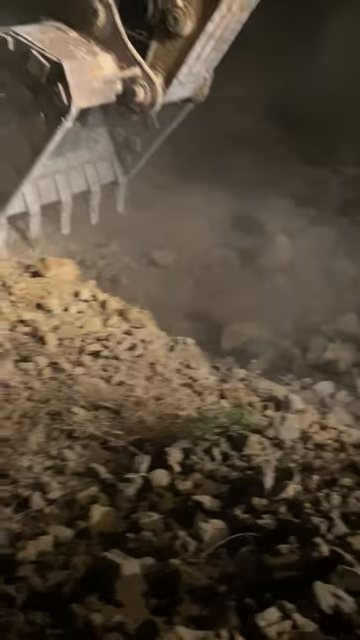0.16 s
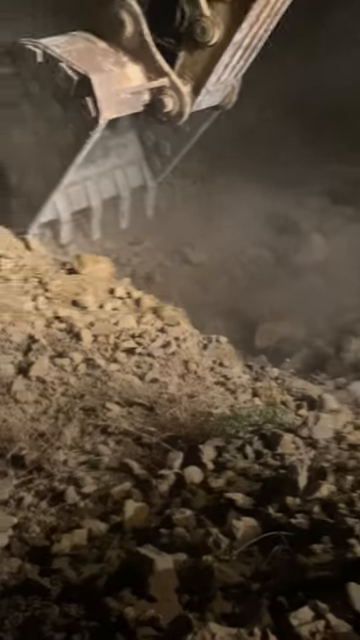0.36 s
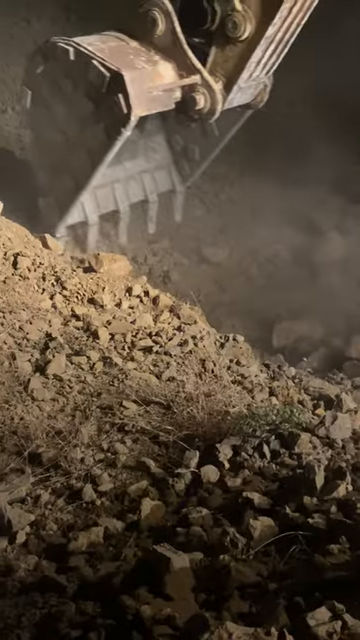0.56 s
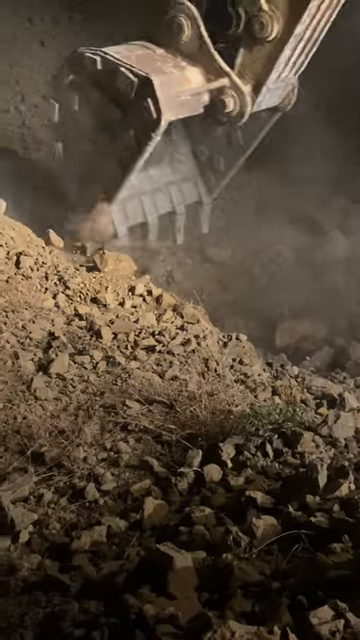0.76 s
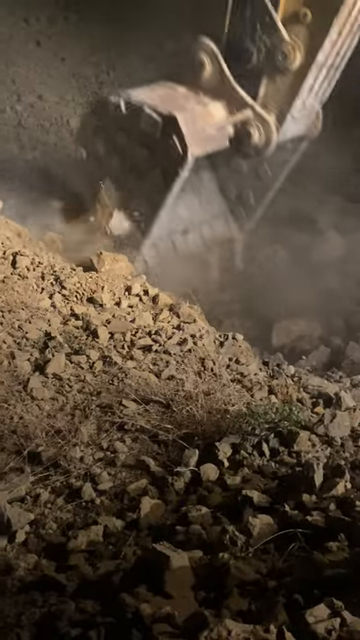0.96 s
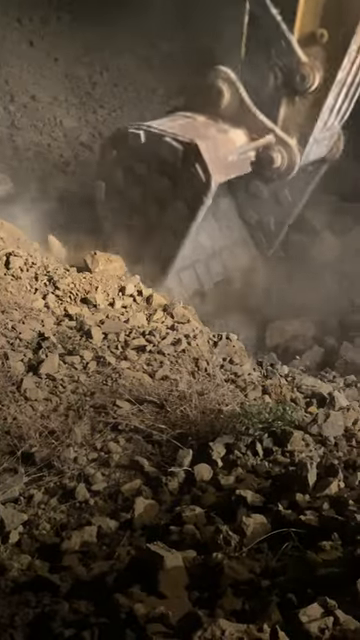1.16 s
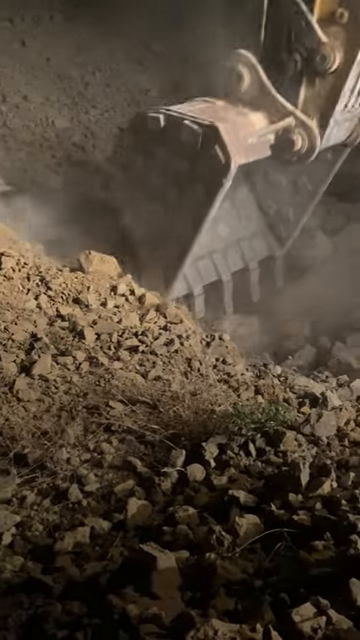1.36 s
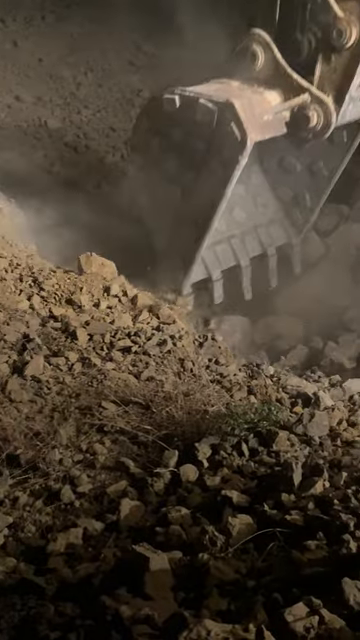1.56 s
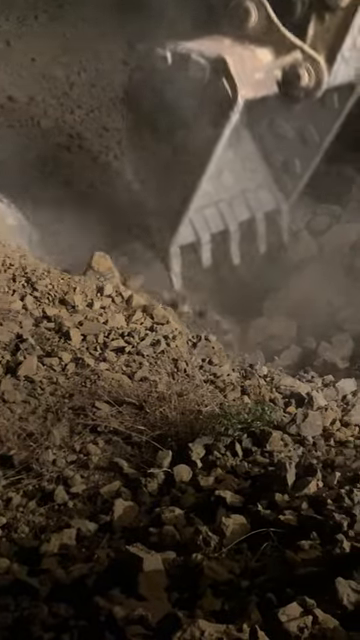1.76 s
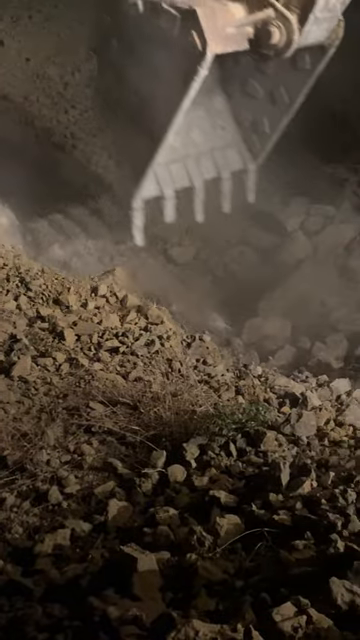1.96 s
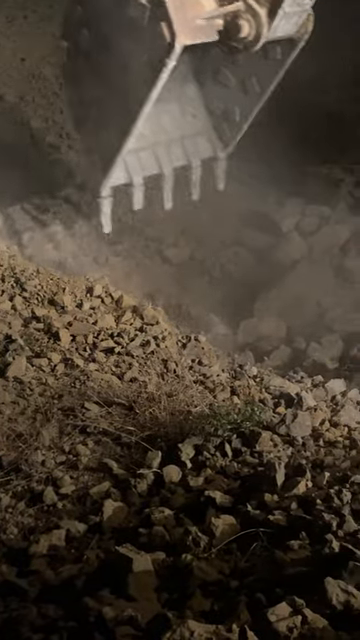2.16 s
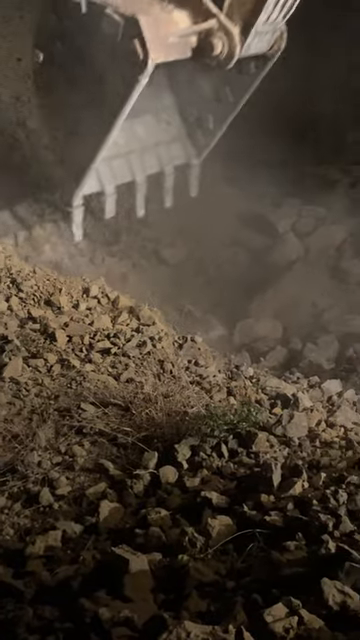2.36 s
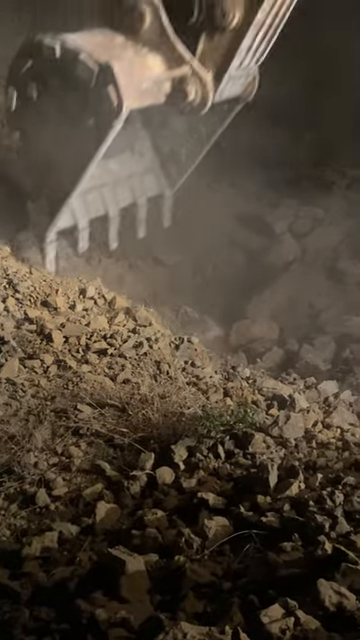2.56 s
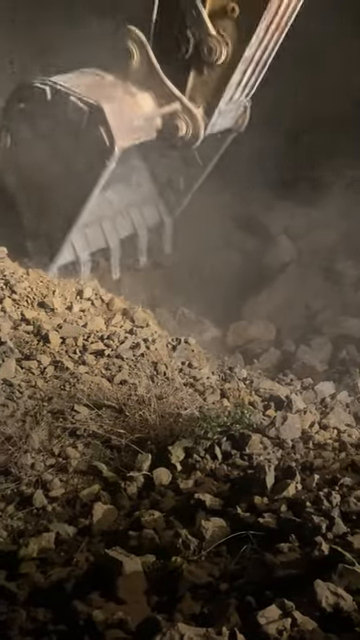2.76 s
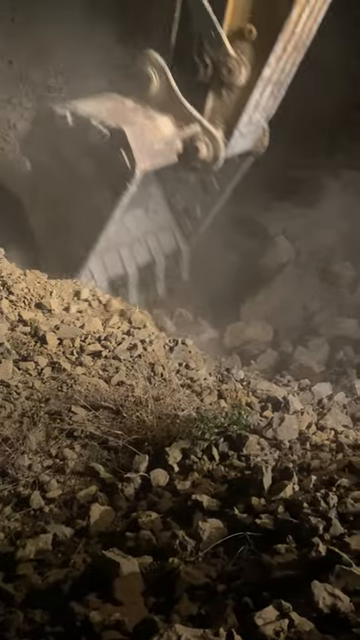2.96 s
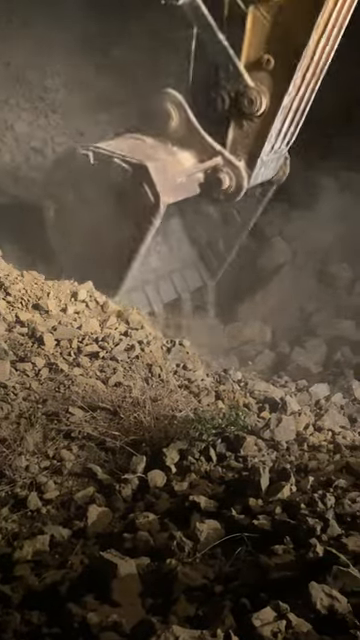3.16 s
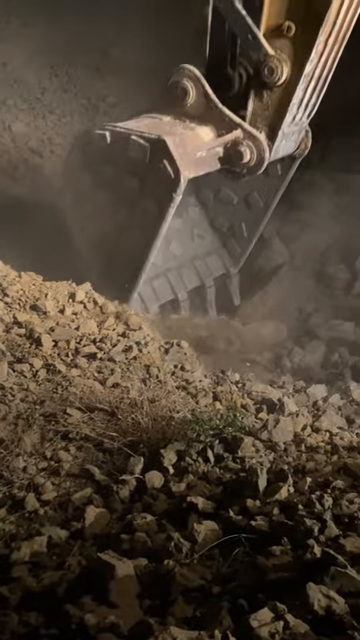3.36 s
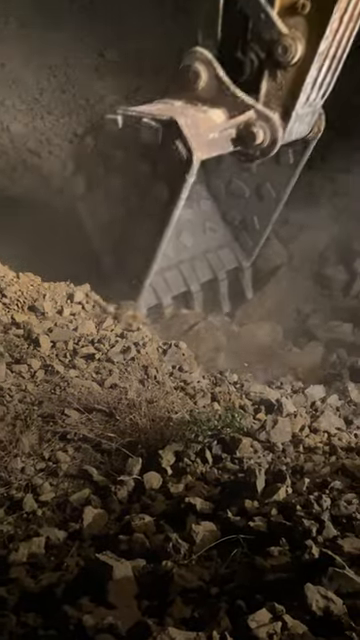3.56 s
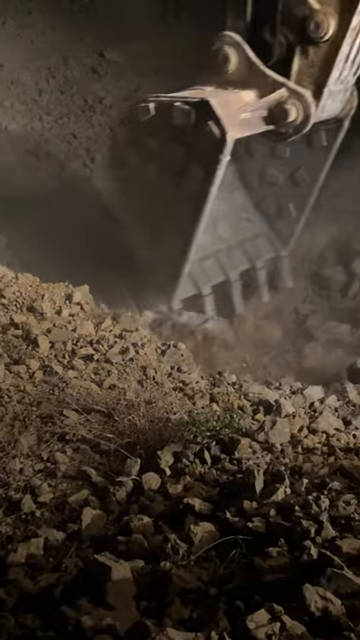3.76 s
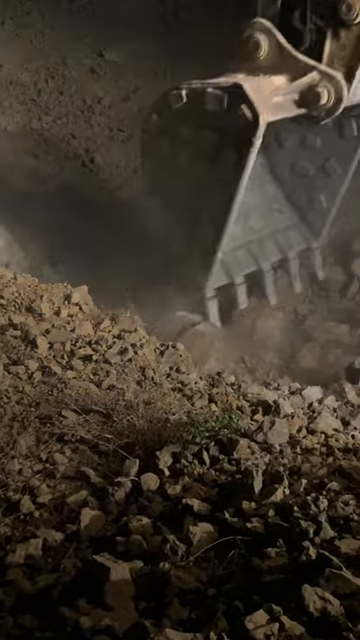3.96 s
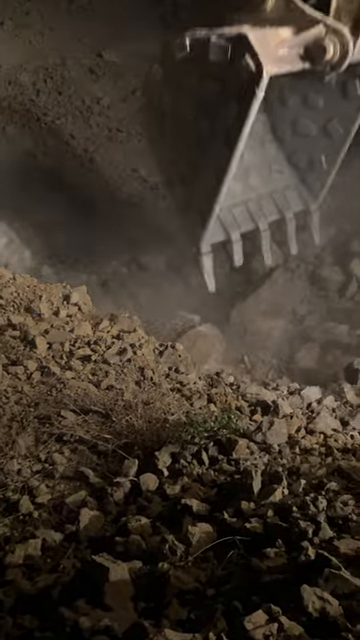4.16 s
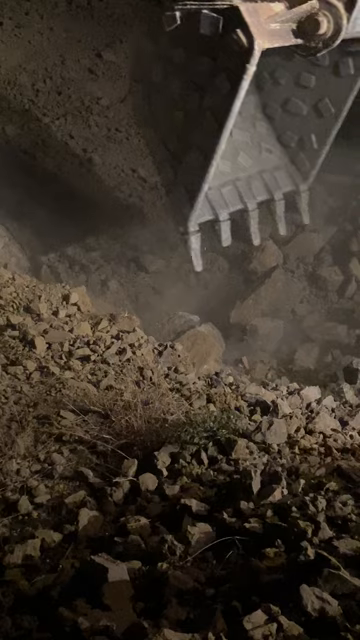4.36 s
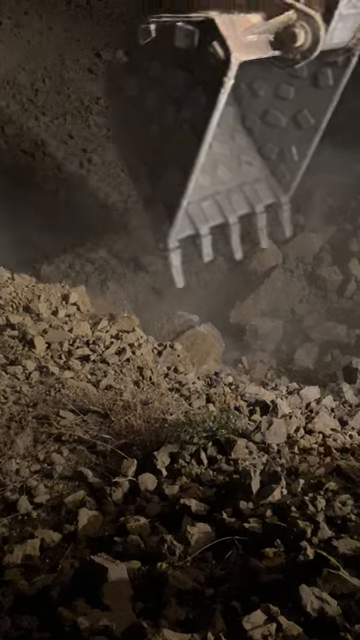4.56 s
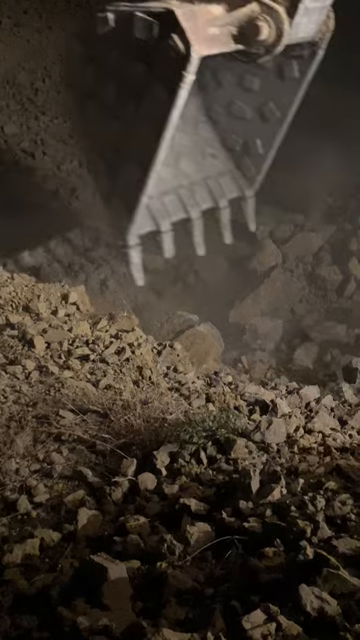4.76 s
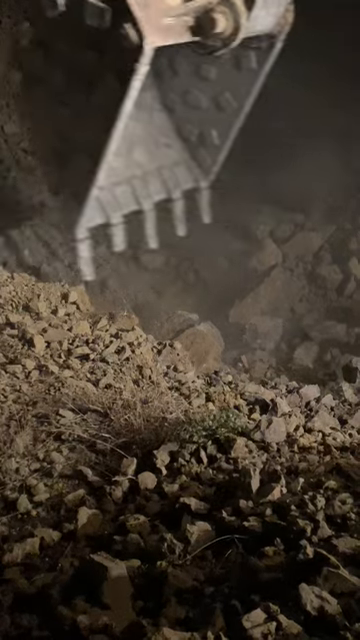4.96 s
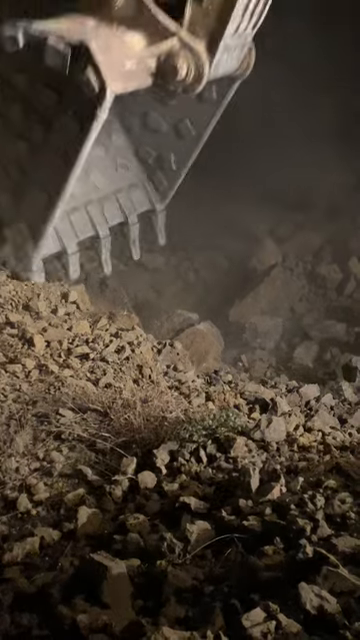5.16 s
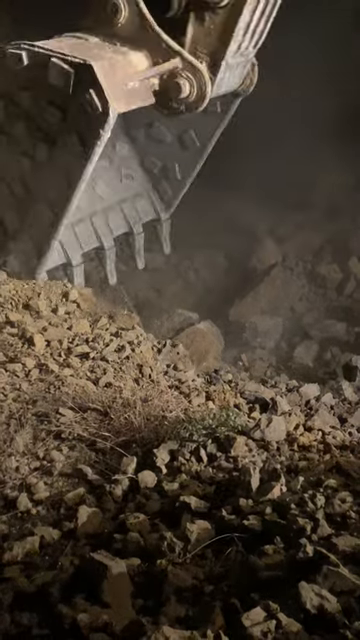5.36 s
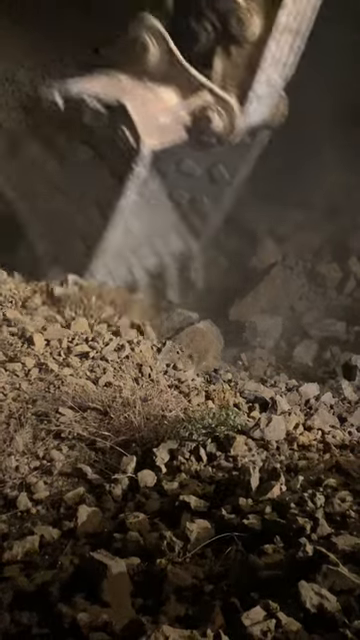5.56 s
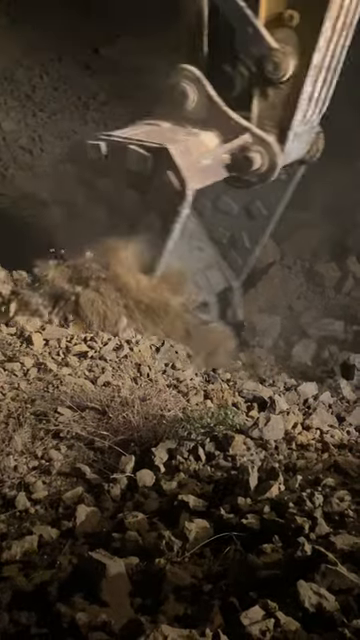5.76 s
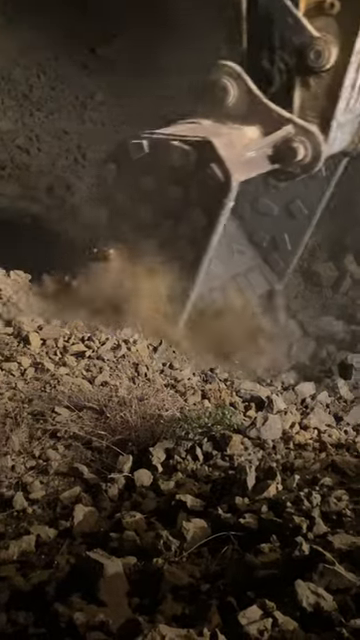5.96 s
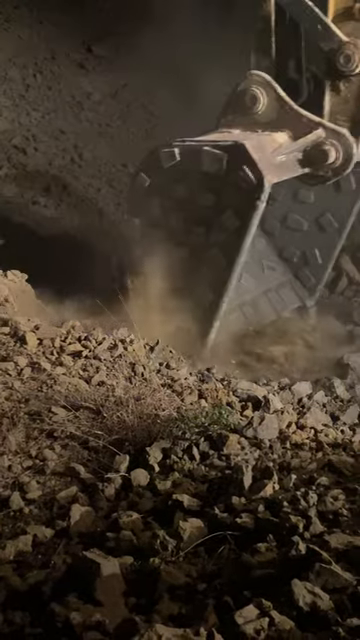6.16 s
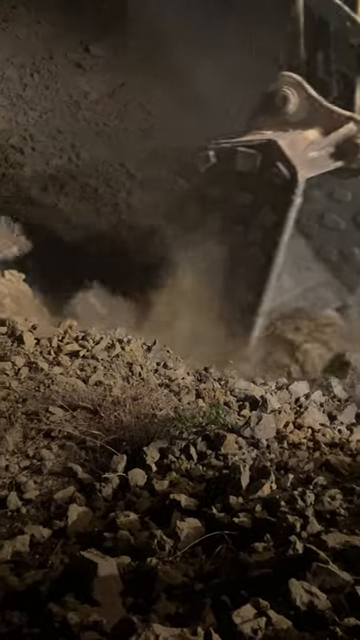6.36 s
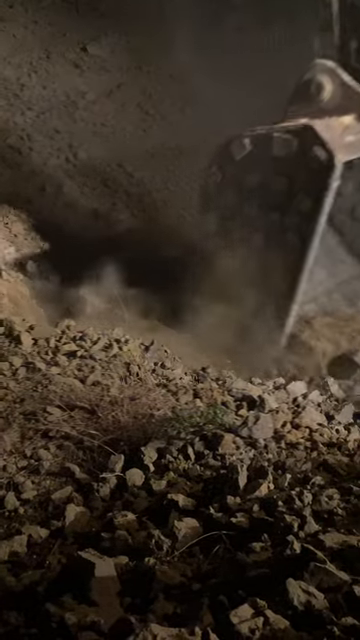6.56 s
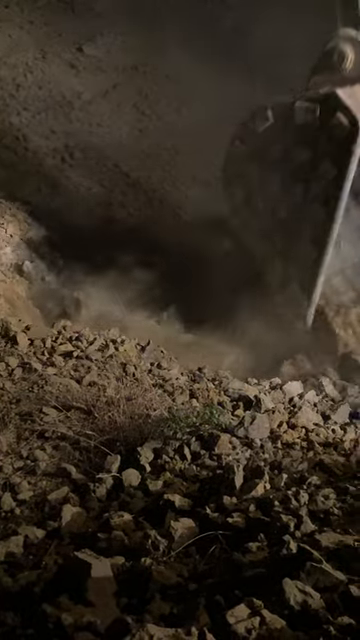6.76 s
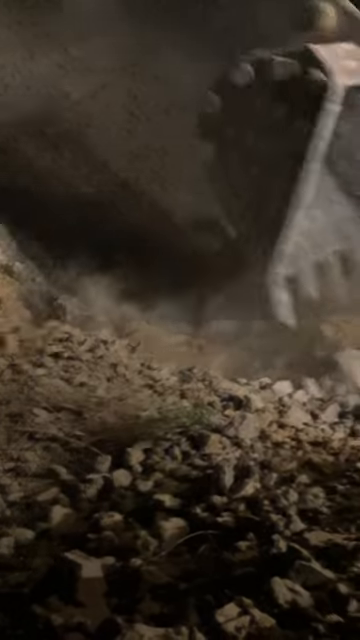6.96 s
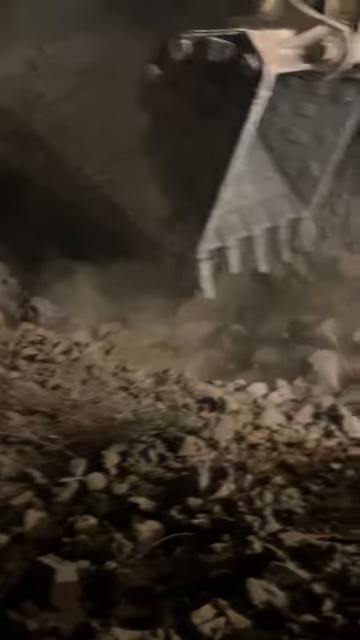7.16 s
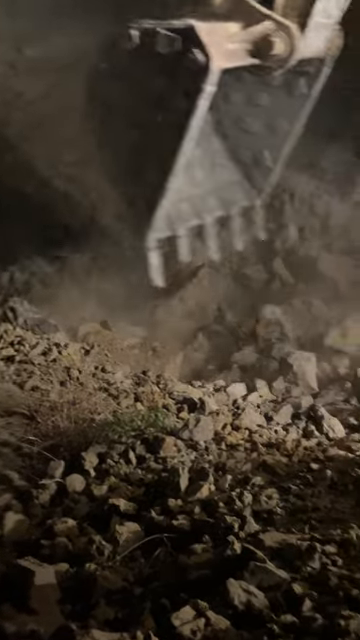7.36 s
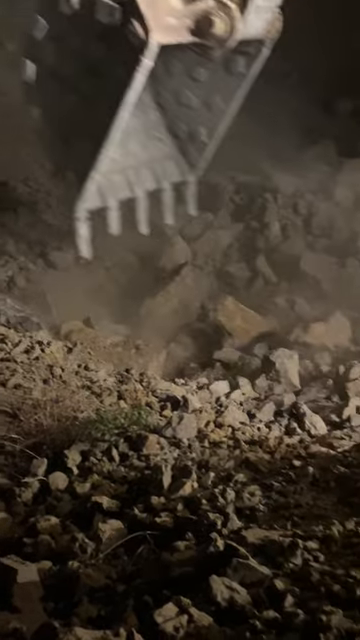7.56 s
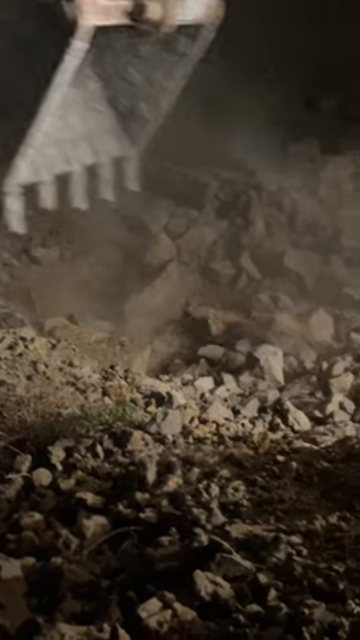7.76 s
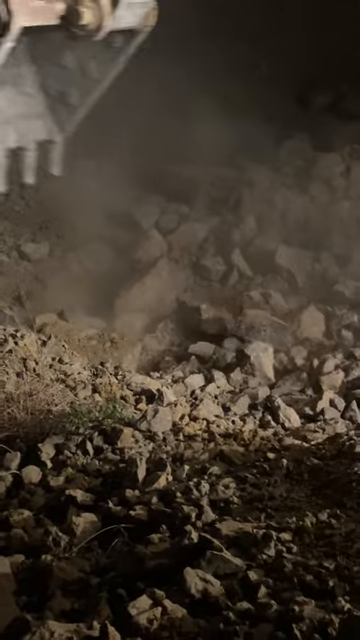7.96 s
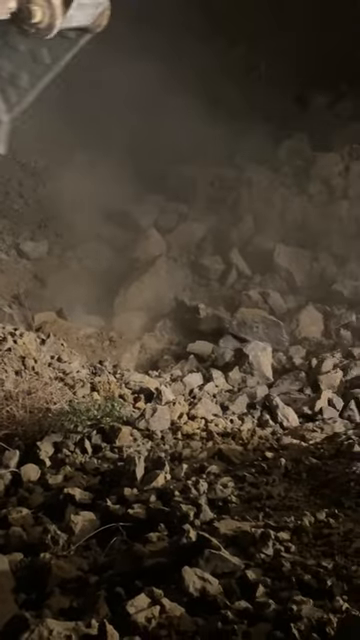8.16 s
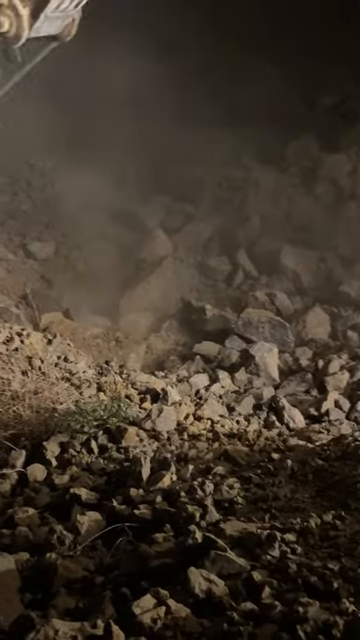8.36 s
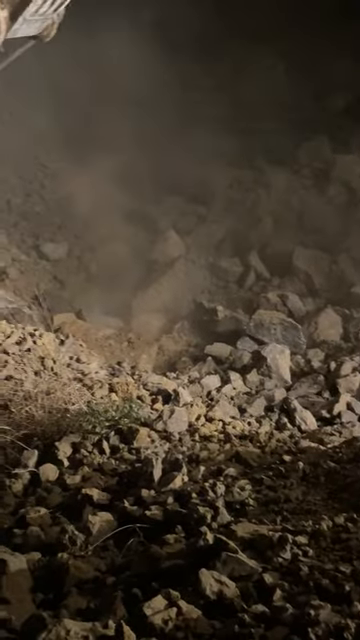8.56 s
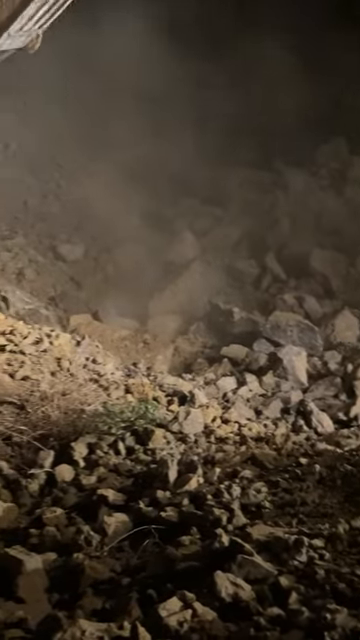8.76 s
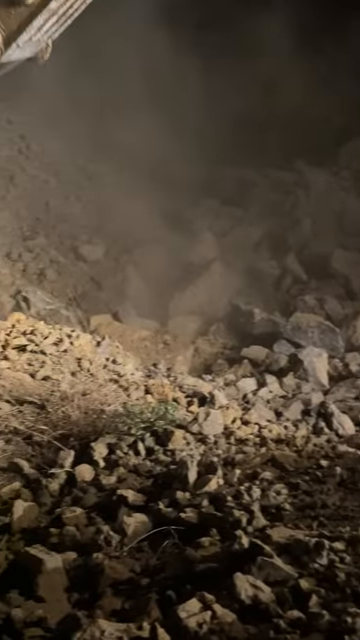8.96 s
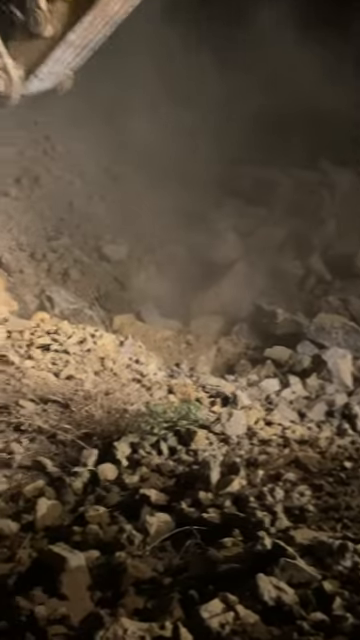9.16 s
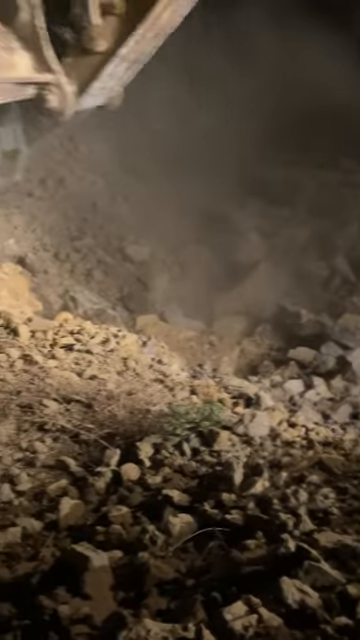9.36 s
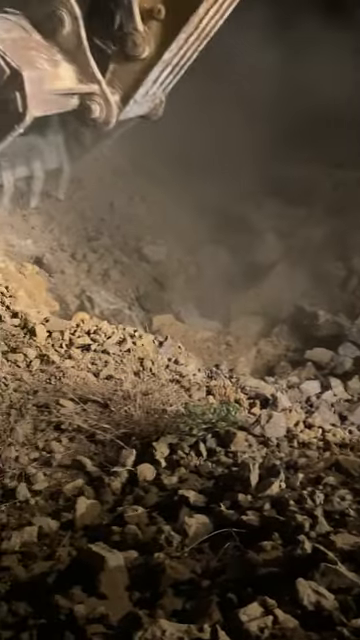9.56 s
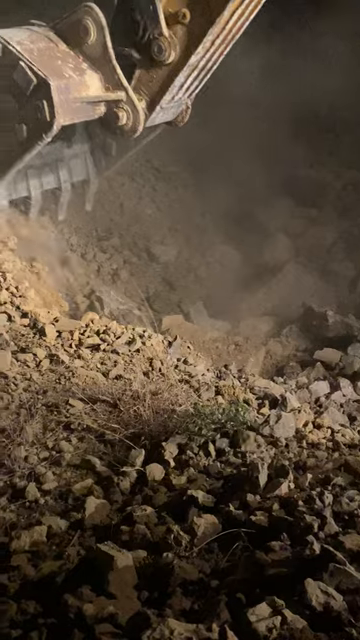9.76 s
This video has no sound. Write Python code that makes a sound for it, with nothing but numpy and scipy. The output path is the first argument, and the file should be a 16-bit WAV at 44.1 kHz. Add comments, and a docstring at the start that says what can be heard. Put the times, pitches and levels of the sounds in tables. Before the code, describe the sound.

Outdoors and close up, an excavator bucket drags through broken rock. Hard knocks, sharp cracks and gritty scraping come in bursts, with short metallic rings and rattling rubble. The scraping thins between strokes, grows dense around six seconds, then nearly stops, leaving the low diesel, a faint hydraulic whine and slight hiss. A final loud crunch begins just after nine seconds.

```python
"""Steel bucket in broken rock

An excavator drags its bucket through broken rock outdoors. Shaped noise makes the grinding and blows;
ringing filters make the steel and stones sing. Pulses and noise make the diesel, wavering sines its hum
and the hydraulic whine, and filtered noise a faint hiss. Two close microphone ports pick it all up."""
import sys
import numpy as np
from scipy import signal
from scipy.fft import rfft, irfft, next_fast_len
from scipy.io import wavfile

SR = 44100
rng = np.random.default_rng(int(sys.argv[2]) if len(sys.argv) > 2 else 0)


def generate_wav(sig):
    """Save sig (samples, or channels by samples) to the path in sys.argv[1] as 16-bit PCM at SR."""
    pcm = np.round(np.clip(np.atleast_2d(sig).T, -1, 1) * 32767).astype(np.int16)
    wavfile.write(sys.argv[1], SR, pcm)


N = 432621
TIME = np.arange(N) / SR   # seconds
SIZE = next_fast_len(N + SR // 4)   # filter length, with room for tails
HZ = np.maximum(np.arange(SIZE // 2 + 1) * SR / SIZE, 1)

# Edges of the five pitch ranges thud, body, rasp, grit and dust: a list of frequencies in Hz.
RANGES_HZ = [60, 400, 1400, 3500, 7000, 12500]
# Grinding of rock on steel, a curve over time. Each row: time in seconds, then the strength
# of body, thud, grit and dust in dB.
GRINDING = [(0.0, -33.5, -34.5, -59, -62), (0.3, -86, -43, -65, -66), (0.44, -29.5, -33, -57, -59),
            (0.74, -31, -30, -42, -54), (0.87, -26, -24, -42, -43), (0.98, -21, -33, -37, -58),
            (1.39, -41, -35, -57.5, -55.5), (1.94, -68, -36, -86, -66), (2.16, -30, -33.5, -47, -61),
            (2.46, -38, -35, -54, -73), (2.68, -37, -33, -55, -60), (2.79, -32.5, -37.5, -47.5, -73),
            (3.17, -24, -17, -36, -45), (3.4, -38, -29, -59.5, -57), (3.9, -34, -37, -52.5, -66),
            (4.07, -54, -43, -49, -71), (4.48, -34.5, -39.5, -91, -66), (4.7, -62, -41.5, -74, -71),
            (5.08, -50, -41, -55, -61), (5.27, -29.5, -45, -38.5, -55), (5.57, -30.5, -29.5, -48.5, -52),
            (5.85, -22, -29, -48, -44), (5.93, -45, -29, -58, -46), (6.02, -23.5, -37, -44, -48),
            (6.2, -34.5, -20, -39, -49), (6.34, -48, -34, -46, -47), (6.54, -33.5, -26, -41, -60),
            (6.67, -26, -23, -38, -54), (6.72, -25, -24, -34, -47), (6.79, -32, -20, -46, -51),
            (6.9, -26, -30.5, -48, -57), (7.16, -33.5, -31.5, -69, -67), (7.38, -46, -37.5, -60, -66),
            (8.14, -52.5, -36.5, -64, -61), (9.15, -37.5, -38.5, -58, -65), (9.23, -24.5, -34, -43, -48),
            (9.32, -18, -18, -38, -48), (9.37, -20, -18, -38, -39.5), (9.81, -23.5, -24.5, -40, -45.5)]
RASP_SHARE, RASP_DB = 0.59, -1   # grinding rasp lies this far from body to grit, then shifted in dB
# Stones and teeth striking. Each row: time in seconds, peak in dB, then thud, rasp and grit in dB
# relative to the body of the blow, the stone's note in Hz, the note in dB relative to the peak,
# basic time to fall 60 dB in seconds.
BLOWS = [(0.172, -22, -4, -16, -25, 556, -27, 0.7), (0.223, -22, -7, -4.5, -15.5, 690, -22, 0.95),
         (0.273, -3, 0.5, 0, -5.5, 860, -17, 0.27), (0.349, -10, -4, -5.5, -6, 1960, -28, 0.43),
         (0.407, -13, -5, -5, -6.5, 1900, -18, 0.23), (0.528, -13, 1, -7, -19, 1100, -25, 0.25),
         (0.677, -27, -25, 1, -13, 1150, -0.5, 0.41), (0.704, -10, 5.5, -5, -16, 1670, -14, 0.58),
         (0.74, -5, -22, -5, -7, 870, -14, 0.28), (0.791, -6.5, -20, -3, -8, 1090, -19, 0.23),
         (0.825, -12.5, -20, 1, -18, 1420, -25, 0.12), (0.898, -11.5, 3.5, -0.5, -8, 1760, -34, 0.44),
         (0.983, -15, -26, -0.5, -9, 1350, -21, 0.48), (1.078, -20.5, 17.5, 0, -25, 1330, -4, 0.36),
         (1.118, -1.5, -42, -3.5, -5.5, 2050, -25, 0.24), (1.335, -17.5, 5, -3.5, -17.5, 610, -12.5, 0.39),
         (1.535, -38.5, -3, 9, 5, 1360, -10, 0.11), (1.594, -30.5, -4, 4.5, -8, 547, -3.5, 0.74),
         (1.622, -13, -1, -1, -15, 577, -22, 0.54), (1.918, -28, -6, 2.5, -10, 500, -12, 0.57),
         (1.935, -13.5, -6, -4.5, -23, 530, -25, 0.81), (2.051, -30, -22, -9, -5, 1820, -3, 0.19),
         (2.086, -22, -7, 5.5, -2, 1930, -24, 0.45), (2.174, -13, -14, -10, -31, 810, -31, 0.79),
         (2.243, -18, 5, -27, -45, 930, -22, 0.11), (2.293, -13.5, 5.5, -9, -9.5, 830, -32, 0.21),
         (2.398, -16.5, -13, -1, -9, 594, -17, 0.28), (2.429, -11.5, 0.5, 0, -19, 1380, -15, 0.18),
         (2.575, -23, -26, 2, -15, 714, -16, 0.21), (2.603, -25, -30, 8.5, -4, 1290, -17, 0.46),
         (2.651, -9.5, -1, -0.5, -12, 1050, -30, 0.71), (2.692, -3.5, -3, -10, -14, 1180, -12.5, 0.2),
         (2.728, -7.5, 1.5, -0.5, -6.5, 920, -12.5, 0.23), (2.857, -17.5, -12, -6, 3, 610, -11.5, 0.17),
         (2.93, -29.5, -32, 7, -18, 636, -8, 0.55), (3.007, -19.5, -17, 6.5, -6, 1140, -5.5, 0.2),
         (3.079, -10.5, 4.5, -23, -31, 1380, -20, 0.13), (3.103, -5, -20, -0.5, -16, 1700, -16.5, 0.34),
         (3.17, -24, 4, -12, -21, 476, -10, 0.85), (3.245, -12.5, -11, -1.5, -16, 1320, -17, 0.46),
         (3.287, -15, -16, -23, -24, 870, -21, 0.81), (3.518, -19, 5, -64, -17, 490, -13, 0.94),
         (3.566, -12.5, 9.5, -7, -22, 1540, -9, 0.18), (3.597, -13.5, -8, -8, -25, 600, -24, 0.14),
         (3.672, -21, -28, 0, -9, 710, -16, 0.3), (3.711, -22, -44, 3, -2.5, 675, -12, 0.23),
         (3.908, -14, -2.5, -9, -22, 560, -26, 0.76), (3.961, -17.5, 10, 8, -8.5, 1410, -14, 0.16),
         (3.979, -25, -8, -7, -8, 1820, 3, 0.15), (4.221, -35.5, 14, 10.5, -12, 482, -7, 0.39),
         (4.292, -27.5, -6, -2.5, -13, 480, -13, 0.54), (4.402, -28.5, -8, 6.5, -8, 1260, -7, 0.4),
         (4.481, -16.5, -2.5, -7, -16.5, 560, -22, 0.5), (4.557, -19, -7, -1, -17, 1670, -16, 0.19),
         (5.073, -21.5, -11, -8, -16, 490, -14.5, 1), (5.091, -18.5, 9.5, 2.5, -5, 653, -14, 0.85),
         (5.19, -6.5, -21, -8, -14, 870, -14, 0.25), (5.2, -4, -4, 2, -14, 1780, -17, 0.15),
         (5.218, -8, -12, -3, -5, 1170, -7.5, 0.15), (5.249, -21.5, -14, -13, 5, 740, -5, 0.17),
         (5.34, -41, -20, -2, -14, 487, -12.5, 0.28), (5.42, -10, -1, -5, -11, 636, -35, 0.28),
         (5.571, -27, -6, 5, -26, 1190, -0.5, 0.26), (5.615, -15, 8, 0, -1.5, 2000, -19.5, 0.93),
         (5.663, 0, -15, -9, -9, 602, -17, 0.25), (5.892, -11, 3, -7, -21, 507, -14.5, 0.75),
         (5.992, -8.5, -13, -7.5, -30, 1100, -11.5, 0.058), (6.04, -11.5, -13, -3, -24, 486, -14, 0.12),
         (6.107, -11, 3.5, -7, -16, 940, -19, 0.51), (6.137, -11, -14, -16, -4, 526, -20, 0.32),
         (6.194, -31, 14, -13, -15, 1170, -11, 0.15), (6.236, -6.5, -8, -13, -37, 1560, -20, 0.13),
         (6.258, -12.5, -6, -14, -30, 436, -7, 0.13), (6.324, -15.5, -18, -4, -12, 470, -15, 0.35),
         (6.362, -14.5, -10, -11, -11, 467, -10, 0.71), (6.398, -6, 1.5, -4, -16, 1230, -17, 0.16),
         (6.428, -6, -3, -20, -15, 417, -28, 0.16), (6.483, -23, -5, 2, 0, 640, -20, 0.21),
         (6.55, -14.5, 2, -1, -5.5, 2980, -29, 0.42), (6.596, -3.5, 1.5, -2, -15, 1800, -24, 0.16),
         (6.729, -9.5, 0.5, -1.5, -9.5, 430, -8, 0.41), (6.745, -7, 0, -7, -13, 1910, -13, 0.11),
         (6.769, -16.5, 0, -11, -20, 460, -11, 0.13), (6.799, -13.5, -12, 1.5, -7, 513, -13, 0.49),
         (6.879, -24, -11, -7, 2.5, 2900, -10, 0.18), (6.934, -12.5, -2.5, -0.5, -12.5, 510, -17, 0.44),
         (7.072, -30, -13, -9, -2, 562, -4, 0.23), (7.095, -15.5, 2, -9, -20, 750, -19, 1),
         (7.134, -25, -12, -8, 10, 2920, -17, 0.34), (7.148, -12.5, -19, -19, -6.5, 1970, -16, 0.52),
         (7.253, -5.5, 0, -13, -11.5, 1770, -24.5, 0.3), (7.3, -13.5, 2.5, -1.5, -39, 515, -16, 0.27),
         (7.439, -37, 1, -7, -26, 520, -19, 0.23), (7.52, -27.5, -13, -3, -33, 537, -23, 0.23),
         (7.603, -35, -10, 0, -11, 800, -20, 0.22), (7.646, -25, -10, -3, -20, 565, -27, 0.52),
         (7.911, -26.5, -11, -1.5, -18, 830, -14, 0.46), (7.975, -27.5, -9, -2.5, -10, 860, -17, 0.68),
         (8.409, -24.5, 8, -7, -21, 800, -13, 0.55), (8.466, -8, 0.5, -12.5, -37, 650, -21, 0.19),
         (8.49, -14.5, -8, -15.5, -30, 825, -13, 0.28), (8.665, -31.5, -9, -6, -17, 534, -8, 0.27),
         (8.73, -34, -6, 1, -20, 1410, -12, 0.11), (8.78, -27.5, 6, -5, -26, 740, -18, 0.22),
         (8.819, -24, -9, -7, -19, 724, -18, 0.11), (8.912, -13.5, -5, -13.5, -33, 1260, -32, 0.35),
         (8.99, -26, 3.5, -16, -24, 670, -11, 0.16), (9.06, -39, -9, -4, -17, 1900, -8, 0.28),
         (9.146, -13, -25, -17, -23, 630, -22, 0.79), (9.18, -11, 4, -1, -8, 2900, -11.5, 0.28),
         (9.196, -8.5, 5, 2.5, -6.5, 915, -9.5, 0.28), (9.282, -12.5, -17, 1, -18, 1150, -8.5, 0.2),
         (9.329, -11, -23, 0.5, -27, 770, -20, 0.79), (9.39, -12, -7, -4, -3.5, 900, -14, 0.31),
         (9.427, 2, -1, -12, -19, 950, -18, 0.1), (9.463, -24.5, 22, 17, -21, 880, -19, 0.41),
         (9.489, -15.5, -6, 3, -2, 880, -4.5, 0.27), (9.555, -6, -14, -10, -17, 1000, -17.5, 0.17),
         (9.622, -4, -23, -14, -36, 945, -18.5, 0.26), (9.701, -26, -5, 15.5, -20, 1840, -6, 0.64),
         (9.791, -9.5, -13, -25, -37, 1015, -8, 0.28)]
# How far each range stretches a blow's rise and fall: one factor each for thud, body, rasp, grit, dust.
BLOW_SLOWNESS = [1.42, 1.14, 0.94, 0.89, 1.2]
RISE_S, HOLD_S = 0.006, 0.015   # a blow's basic rise, centred on its time; its fall starts at HOLD_S
CREST_DB = 11   # a blow's peak over its rms
BLOW_DUST_DB, BLOW_DUST_FOLLOWS = -30.5, 0.2   # dust relative to the body; dB of dust per dB of grit
# Stones splitting with a sharp bright crack. Each row: time in seconds, grit peak in dB,
# dust rms in dB, time to fall 60 dB in seconds.
CRACKS = [(0.268, -15, -43, 0.1), (0.536, -32, -55, 0.16), (0.6724, -29, -54, 0.11),
          (0.7128, -31, -48, 0.14), (0.7397, -13, -46, 0.12), (0.7926, -27, -38, 0.12),
          (0.9004, -30, -51, 0.12), (1.0028, -20, -37, 0.1), (1.119, -7, -28, 0.11),
          (1.5359, -36, -41, 0.12), (1.6053, -33, -63, 0.12), (1.631, -23, -43, 0.32),
          (1.934, -30, -44, 0.12), (1.9599, -36, -63, 0.12), (2.0567, -33, -59, 0.14),
          (2.0877, -39, -64, 0.12), (2.1585, -28, -59, 0.092), (2.1772, -25, -36, 0.07),
          (2.2957, -25, -65, 0.14), (2.3925, -29, -46, 0.12), (2.602, -24, -54, 0.12),
          (2.6529, -23, -50, 0.12), (2.6863, -30, -37, 0.2), (2.723, -16, -34, 0.13),
          (2.8569, -21, -41, 0.11), (3.0185, -21, -59, 0.17), (3.0864, -36, -49, 0.11),
          (3.1068, -25, -36, 0.12), (3.1517, -25, -47, 0.12), (3.2819, -24, -41, 0.2),
          (3.5603, -36, -56, 0.12), (3.5897, -37, -42, 0.16), (3.667, -35, -58, 0.12),
          (3.7105, -33, -56, 0.11), (3.9429, -34, -57, 0.12), (3.967, -32, -56, 0.12),
          (4.0502, -40, -50, 0.13), (4.4032, -33, -49, 0.11), (4.4807, -44, -50, 0.11),
          (4.5017, -38, -62, 0.12), (4.563, -41, -63, 0.12), (5.0938, -40, -61, 0.12),
          (5.1936, -22, -22.5, 0.16), (5.4188, -21, -33, 0.11), (5.4386, -19, -49, 0.17),
          (5.6196, -11.5, -46, 0.1), (5.665, -4, -31, 0.16), (5.898, -39, -51, 0.13),
          (5.9903, -37, -53, 0.099), (6.0252, -35, -30.5, 0.16), (6.119, -30, -50, 0.14),
          (6.137, -34, -55, 0.12), (6.2487, -37, -36, 0.12), (6.3056, -29, -36, 0.11),
          (6.383, -20, -51, 0.15), (6.3999, -24, -40, 0.12), (6.4867, -22, -53, 0.12),
          (6.55, -27, -57, 0.12), (6.8044, -33, -53, 0.14), (6.881, -24, -48, 0.12),
          (6.927, -18, -43, 0.15), (7.087, -20, -61, 0.19), (7.1387, -28, -41, 0.12),
          (7.1583, -19, -45, 0.095), (7.2549, -22, -26, 0.044), (7.7643, -49, -47, 0.18),
          (7.9139, -38, -67, 0.12), (7.9763, -38.5, -68, 0.1), (9.1391, -42, -48, 0.16),
          (9.1845, -17, -50, 0.12), (9.2948, -23, -45, 0.12), (9.3307, -23, -37, 0.12),
          (9.3666, -24, -41, 0.12), (9.3921, -19, -46, 0.12), (9.494, -19, -36, 0.12)]
CRACK_RISE_S, CRACK_CREST_DB, CRACK_RASP_DB = 0.00082, 10.5, -4   # rise; peak over rms; rasp over grit


def contact_force():
    """Rock presses on steel: grinding, blows and cracks add their power in each pitch range."""
    body_db, thud_db, grit_db, dust_db = in_time(GRINDING)
    rasp_db = RASP_DB + body_db + RASP_SHARE * (grit_db - body_db)
    grinding = amp([thud_db, body_db, rasp_db, grit_db, dust_db])
    power = (grinding * wander(spread_db=2.3, rate=22)) ** 2   # the grinding passes in clumps
    for s, peak_db, thud_db, rasp_db, grit_db, note_hz, note_db, t60 in BLOWS:
        dust_db = BLOW_DUST_DB + BLOW_DUST_FOLLOWS * grit_db
        ranges_db = [thud_db, 0, rasp_db, grit_db, dust_db]
        # the thud swells slowest and lasts longest
        for k, (db, slow) in enumerate(zip(ranges_db, BLOW_SLOWNESS)):
            swell = blow_swell(RISE_S * slow ** 3, t60 * slow)
            add(power[k], s - RISE_S / 2, (amp(peak_db - CREST_DB + db) * swell) ** 2)
    for s, peak_db, dust_db, t60 in CRACKS:
        age = TIME[:SR // 4]
        snap = np.minimum(age / CRACK_RISE_S, 1) * amp(-60 * age / t60)
        grit_db = peak_db - CRACK_CREST_DB
        for k, db in [(2, grit_db + CRACK_RASP_DB), (3, grit_db), (4, dust_db)]:
            add(power[k], s, (amp(db) * snap) ** 2)
    return np.sqrt(power)


def blow_swell(rise, t60):
    """A blow rises quickly, crushes briefly at full strength, then falls evenly in dB."""
    age = TIME[:SR // 3]
    return np.minimum(age / max(rise, .0004), 1) * amp(-60 * np.maximum(age - HOLD_S, 0) / t60)


# Colour of rock on steel. Each row: frequency in Hz, relative level in dB per Hz.
ROCK_COLOUR = [(25, -46), (50, -55), (90, -8), (200, 8), (500, -7), (1000, -4.5), (1900, -6), (2300, -10.5),
               (3200, -12), (3800, -23), (4600, -20.5), (6400, -25), (8000, -27.5), (12500, -27.5),
               (16000, -31.5)]
# Ringing modes of bucket and arm. Each row: frequency in Hz, relative level in dB,
# time to fall 60 dB when ringing freely, in seconds.
STEEL_MODES = [(99.4, -1, 0.29), (161.4, 8.5, 0.47), (249.9, 3, 0.9), (350, 0, 0.6), (395, 1, .6),
               (446.4, -1, 0.5), (530, -0.5, 0.77), (646, 0, 0.65), (716, -2.5, 1.5), (782, -1, 0.6),
               (894, -2, 0.4), (953, -15.5, 0.9), (1080, -17, 1.2), (1150, -3.5, 1.2), (1242, -0.5, 0.88),
               (1394, -1, 0.35), (1580, -12.5, 0.6), (1760, -21.5, 0.26), (1906, -0.5, 0.5),
               (2390, -11, 0.5), (2550, -7, 0.5), (2870, -7.5, 0.65), (3047, -10, 0.4), (3190, -7, 0.3),
               (4090, -8, 0.4), (4118, -8, 0.56), (4560, -2, 0.1), (4890, -10, 0.12), (5730, -14, 0.2),
               (12690, -9, 0.36)]
DAMPED = .27   # share of the ring time left while rock lies on the steel
CLUMP_DB, CLUMPS_PER_S = 1.5, 30   # quick unevenness of each patch of colour
UPPER_RASP_LEAN, UPPER_RASP_DB = 0.34, 4   # the upper rasp leans toward the grit: dull blows stay dull


def bucket():
    """Contacts are heard directly, in patches of colour, and set the steel's modes ringing."""
    strength = contact_force()
    force = strength * grains(per_s=3000, spread_db=2.6, smooth=.9)
    rock, heard = shape(ROCK_COLOUR), 0
    edges = [1, 130, 400, 750, 1400, 2200, 3500, 4900, 7000, 30000]   # Hz
    below = [1 / (1 + (HZ / hz) ** 8) for hz in edges]
    for hz, under, over in zip(edges, below, below[1:]):
        k = max(np.searchsorted(RANGES_HZ, hz, "right") - 1, 0)   # the range this patch belongs to
        inside = (HZ > RANGES_HZ[k]) & (HZ < RANGES_HZ[k + 1])
        range_rms = np.sqrt(np.sum(rock[inside] ** 2) / len(HZ))
        gain = rock * np.sqrt(over - under) / range_rms
        lean = 1
        if hz == 2200:
            lean = amp(UPPER_RASP_DB) * (strength[3] / strength[2]) ** UPPER_RASP_LEAN
        drift = wander(spread_db=2.0, rate=4.6) * wander(CLUMP_DB, CLUMPS_PER_S)
        heard = heard + rfft(force[k] * lean * drift, SIZE) * gain
    out = amp(-6.5) * irfft(heard, SIZE)[:N]
    out += rubble(strength[1], 450, 1400, per_s=70, db=-31.0)
    out += rubble(strength[2], 1500, 3400, per_s=100, db=-22.0)
    out += rubble(strength[3], 3600, 6500, per_s=120, db=-26.0)
    for hz, db, t60 in STEEL_MODES:
        k = min(np.searchsorted(RANGES_HZ, hz) - 1, len(force) - 1)
        push = force[k] * wander(spread_db=3.5, rate=9)
        steady = np.sqrt(DAMPED * t60 * SR / (4 * np.log(1000)))   # the ring's rms under unit noise
        out += amp(db - 17.0) / steady * ring(push, hz, DAMPED * t60)
    return out


def rubble(force, low_hz, high_hz, per_s, db):
    """Small stones knock at random under the grinding, each at one of 12 pitches, low ones louder."""
    pitches, dealt = np.geomspace(low_hz, high_hz, 12), rng.integers(0, 12, N)
    knocks = force * grains(per_s=per_s, spread_db=2.5, smooth=.01)
    rings = 0
    for k, hz in enumerate(pitches):
        rings = rings + ring(knocks * (dealt == k), hz, 75 / hz) * (hz / low_hz) ** -.6
    return amp(db) * rings


NOTE_LASTS = 1.13   # the stone's note outlasts the blow by this factor


def stones():
    """Each struck stone rasps: noise rings around a note of its own and dies with the blow."""
    out = np.zeros(N)
    for blow, rasp in zip(BLOWS, rng.standard_normal((len(BLOWS), SR // 3))):
        s, peak_db, *_, note_hz, note_db, t60 = blow
        ring_s = 12.0 / note_hz
        noted = rms_one(ring(ring(rasp, note_hz, ring_s), note_hz, ring_s))
        swell = blow_swell(RISE_S, NOTE_LASTS * t60)
        add(out, s - RISE_S / 2, amp(peak_db + note_db) * noted * swell)
    return out


# Taps that leave one steel mode ringing freely. Each row: time in seconds,
# frequency in Hz near the mode, level in dB.
FREE_RINGS = [(0.289, 1906, -22), (1.13, 2870, -33), (1.129, 4118, -40), (1.4, 3047, -44),
              (6.88, 3047, -32), (6.4, 3047, -31), (4.0, 12690, -46), (5.43, 4118, -45), (6.74, 12690, -46),
              (6.976, 12690, -41), (7.307, 12690, -46), (8.48, 716, -36), (8.479, 530, -46)]
TAP_S = .012   # a tap's contact time


def pings():
    """A tap on bare steel lets the nearest mode swell over the contact and ring out in full."""
    out, tap, age = np.zeros(N), np.eye(1, SR)[0], TIME[:SR]
    for s, tapped_hz, db in FREE_RINGS:
        hz, _, t60 = min(STEEL_MODES, key=lambda mode: abs(mode[0] - tapped_hz))
        add(out, s, amp(db) * np.minimum(age / TAP_S, 1) * ring(tap, hz, t60))
    return out


# Pebbles ticking on steel. Each row: time in seconds, level in dB before TICK_DB, note in Hz.
TICKS = [(0.7931, -5, 1360), (1.3364, -28, 1240), (2.0877, -20, 1960), (2.4044, -25, 1390),
         (2.5765, -19, 1380), (4.2244, -34, 1500), (4.3011, -24, 1740), (4.4014, -17, 2990),
         (4.5014, -22, 1600), (4.5627, -25, 1750), (5.2041, -2, 1820), (6.5504, -17, 1610),
         (7.443, -26, 3040), (7.5203, -32, 1360), (7.6026, -41, 1770), (7.649, -28, 1510),
         (7.6949, -27, 1700), (8.6647, -33, 1270), (8.7306, -30, 1750), (8.7789, -31, 1220),
         (8.8189, -26, 1210), (8.9127, -21, 1360), (9.183, -5, 2420)]
TICK_T60_S, TICK_DB = 0.073, -11   # time to fall 60 dB; gain of the note


def ticks():
    """Each pebble gives a click that rings briefly on its own note."""
    tap, out = np.eye(1, SR // 8)[0], np.zeros(N)
    for s, db, hz in TICKS:
        add(out, s, amp(db + TICK_DB) * ring(tap, hz, TICK_T60_S))
    return out


CLANG_DB, CLANG_SPREAD_DB, CLANG_LASTS = -15.0, 3.5, .28   # gain; chance; share of the free ring time


def clangs():
    """Each crack strikes the bucket's upper modes, every mode with a strength of its own."""
    s, peak_db = np.transpose(CRACKS)[:2]
    upper = [mode for mode in STEEL_MODES if 1800 < mode[0] < 7000]
    out = 0
    for (hz, db, t60), chance in zip(upper, rng.standard_normal((len(s), len(upper))).T):
        clicks = np.zeros(N)
        clicks[(s * SR).astype(int)] = amp(peak_db + db + CLANG_DB + CLANG_SPREAD_DB * chance)
        out = out + ring(clicks, hz, CLANG_LASTS * t60)
    return out


# The diesel over time. Each row: time in seconds, average firings per second, level in dB rms.
DIESEL = [(0, 92, -37.5), (2, 65, -36.5), (4, 70, -35.5), (4.8, 72, -39), (7.5, 56, -34.5),
          (8.4, 68.5, -39), (9.81, 78, -30.5)]
# Colour of the exhaust. Each row: frequency in Hz, relative level in dB per Hz.
EXHAUST_COLOUR = [(18, -35), (30, 1), (64, -19), (88, 2), (129, -24), (170, 2.5), (199, -54), (443, -11.5),
                  (556, -17), (4050, -50), (5200, -60), (7000, -44), (9100, -67), (15400, -120)]


def diesel():
    """One uneven pulse a firing, with fan and casing rumble, through the exhaust's colour."""
    per_s, level_db = in_time(DIESEL)
    firings = np.cumsum(per_s * wander(spread_db=2.0, rate=8)) / SR
    fired = np.diff(np.floor(firings), prepend=0)
    pulses = fired * amp(3.7 * rng.standard_normal(N))
    soft = signal.lfilter([.07], [1, -.93], pulses)   # the pulses carry mostly low notes
    rumble = rng.standard_normal(N) * wander(spread_db=1.3, rate=4)
    return amp(level_db) * rms_one(colour(rms_one(soft) * 0.13 + rumble, shape(EXHAUST_COLOUR)))


# Steady hum of the engine's frame. Each row: average frequency in Hz, dB over the diesel's level.
FRAME_HUM = [(92, -6), (165, -4.5), (248, -4.5)]


def hum():
    """The frame hums in low tones whose pitch and level waver and whose level follows the diesel."""
    level_db = in_time(DIESEL)[1]
    out = np.zeros(N)
    for hz, db in FRAME_HUM:
        gain = amp(level_db + db) * wander(spread_db=3.5, rate=3.9)
        pitch_hz = hz * wander(spread_db=0.48, rate=1.518)
        out += gain * np.sin(2 * np.pi * np.cumsum(pitch_hz) / SR)
    return out


# Hydraulic whine, one row a stroke. Each row: start in seconds, length in seconds,
# average pitch in Hz, average peak in dB.
WHINES = [(0.013, 0.12, 559, -37.5), (4.863, 0.19, 863, -49), (7.356, 0.45, 572, -44.5),
          (7.4, 0.32, 535, -45), (8.016, 0.22, 535, -43), (8.65, .25, 4500, -62)]
WHINE_FADE_S = 0.023


def hydraulics():
    """A slightly unsteady tone while a valve is open."""
    out = np.zeros(N)
    for s, length, hz, db in WHINES:
        pitch_hz = hz * wander(spread_db=.07, rate=8)
        gain = opened(s, length, WHINE_FADE_S) * amp(db) * wander(spread_db=2.5, rate=10)
        out += gain * np.sin(2 * np.pi * np.cumsum(pitch_hz) / SR)
    return out


# A faint airy hiss, likely oil through a valve. Each row: start in seconds, length in seconds,
# centre in Hz, rms level in dB before the swell sinks.
VALVE_HISS = [(7.714, 0.2, 4940, -53), (7.9, 0.26, 4930, -52), (8.218, 0.37, 5200, -55.5),
              (8.273, 0.12, 4300, -55), (8.64, 0.28, 4440, -58)]
VALVE_RISE_S, VALVE_FALL_DB = 0.024, 8.5   # each swell opens quickly and sinks over its length
VALVE_T60_S = 0.0013   # a short ring time makes a broad, airy resonance


def valve_hiss():
    """Noise in a resonance of its own for each swell."""
    out = np.zeros(N)
    for s, length, hz, db in VALVE_HISS:
        sinking = amp(db - VALVE_FALL_DB * np.clip((TIME - s) / length, 0, 1))
        hiss = rms_one(ring(ring(rng.standard_normal(N), hz, VALVE_T60_S), hz, VALVE_T60_S))
        out += opened(s, length, VALVE_RISE_S) * sinking * hiss
    return out


def opened(start, length, fade):
    """Gain 0 to 1 of a valve that opens, stays and shuts."""
    return np.clip(np.minimum(TIME - start, start + length - TIME) / fade, 0, 1)


# Scattered sound that the ports do not share. Each row: frequency in Hz, dB relative to the sources.
SCATTER = [(30, -58), (300, -24), (600, -11), (1600, -15), (3300, -19.5), (6000, -18), (7300, -24),
           (9000, -13), (10300, -17), (11700, -4), (13500, -26), (15200, 3)]


def scattered(x):
    """Scatter off the rock pile: a trail of noise that falls 60 dB in 0.2 s."""
    age = TIME[:SR // 5]
    trail = rng.standard_normal(len(age)) * amp(-60 * age / .2)
    return colour(x, shape(SCATTER) * rfft(trail / np.linalg.norm(trail), SIZE))


def amp(db):
    """Decibels to gain."""
    return 10 ** (np.asarray(db) / 20)


def rms_one(x):
    """Scale to unit power."""
    return x / np.sqrt(np.mean(x ** 2) + 1e-20)


def in_time(rows):
    """Each column of a curve table at every sample."""
    s, *columns = np.transpose(rows)
    return [np.interp(TIME, s, c) for c in columns]


def shape(points):
    """A table of Hz and dB as gain at every frequency."""
    hz, db = np.transpose(points)
    return amp(np.interp(np.log(HZ), np.log(hz), db))


def colour(x, gain):
    """Filter by a gain per frequency."""
    return irfft(rfft(x, SIZE) * gain, SIZE)[..., :N]


def ring(x, hz, t60):
    """A unit click sets a sine ringing from height 1, falling 60 dB in t60 seconds."""
    r, w = amp(-60 / (t60 * SR)), 2 * np.pi * hz / SR
    return signal.lfilter([0, np.sin(w)], [1, -2 * r * np.cos(w), r * r], x + 1e-18)


def grains(per_s, spread_db, smooth):
    """Tiny contacts of uneven size over a smooth hiss; unit power."""
    sizes = amp(spread_db * np.minimum(rng.exponential(1, N), 5)) * rng.choice([-1, 1], N)
    contacts = rms_one(sizes * (rng.random(N) < per_s / SR))
    return rms_one(contacts + smooth * rng.standard_normal(N))


def wander(spread_db, rate):
    """A gain that drifts by chance, at about the given rate a second."""
    r = np.exp(-80 * np.pi * rate / SR)   # one step every 40 samples
    slow = signal.lfilter([1], [1, -2 * r, r * r], rng.standard_normal(N // 40 + 2002))[2000:]
    return np.interp(np.arange(N) / 40, np.arange(len(slow)), amp(spread_db * rms_one(slow)))


def add(track, s, sound):
    """Mix a sound into a track at a time in seconds."""
    start = int(s * SR)
    track[start:start + len(sound)] += sound[:N - start]


# Phase between the ports. Each row: frequency in Hz, half turns by which left leads.
PORT_LEAD = [(0, 0), (550, 0), (1000, -.08), (1640, -.1), (2500, .22), (3530, .03), (4390, .31),
             (5050, .07), (7000, 1), (7700, 1), (9750, 2), (10900, 2), (13200, 3), (14200, 3), (15500, 3.9),
             (16500, 4)]
# Level between the ports. Each row: frequency in Hz, left over right in dB.
PORT_BALANCE = [(520, 0), (900, 2.8), (1250, 1.2), (1700, 1.7), (2400, 0)]


def scene():
    """All sources stand to one side: the ports differ in phase and a little in level."""
    site = bucket() + stones() + pings() + ticks() + clangs()
    site = site + diesel() + hum() + hydraulics() + valve_hiss()
    lead = np.interp(HZ, *np.transpose(PORT_LEAD))
    half = np.exp(.5j * np.pi * lead) * np.sqrt(shape(PORT_BALANCE))   # half the difference on each side
    direct = colour(site, np.array([half, 1 / half]))
    return direct + scattered(site) * np.array([[1], [-1]])   # scatter has opposite sign in each port


RUMBLE_CUT_HZ, CUTOFF_HZ = 53.4, 16100


def record(dry):
    """The deepest rumble is cut, peaks are rounded, the top is cut."""
    rumble_cut = signal.butter(4, RUMBLE_CUT_HZ, "high", fs=SR, output="sos")
    top_cut = signal.cheby2(20, 95, CUTOFF_HZ, fs=SR, output="sos")
    firm = signal.sosfilt(rumble_cut, dry)
    rounded = 1.05 * np.tanh(firm / 1.05)
    return signal.sosfilt(top_cut, rounded)


dry = scene()
out = record(dry)
generate_wav(out)
```